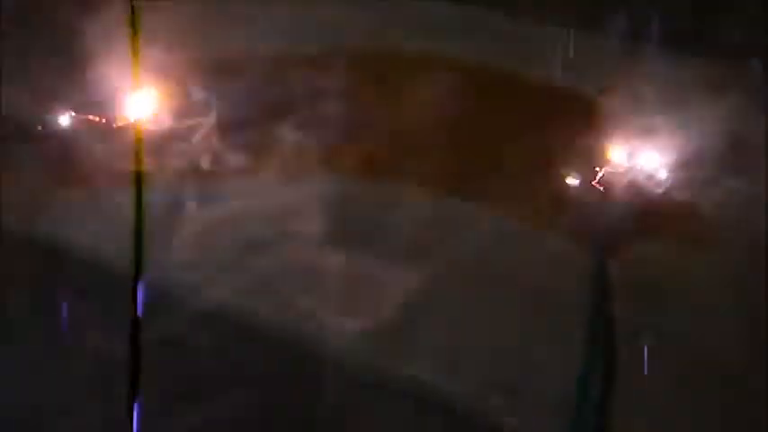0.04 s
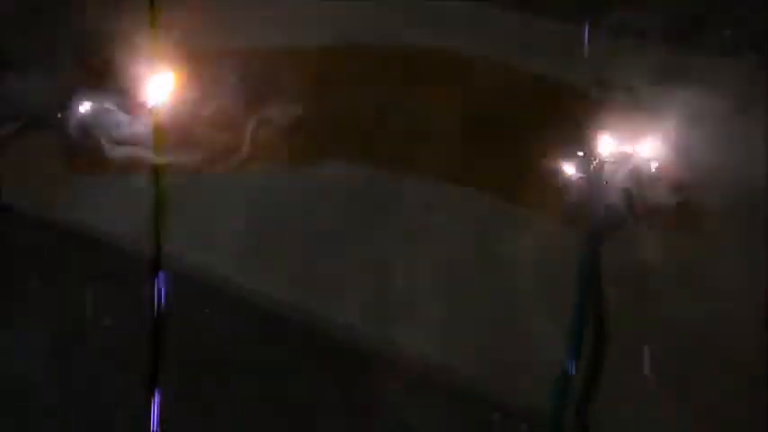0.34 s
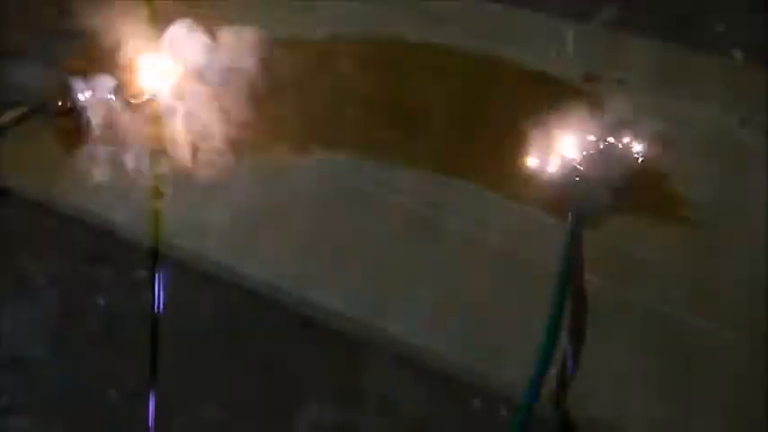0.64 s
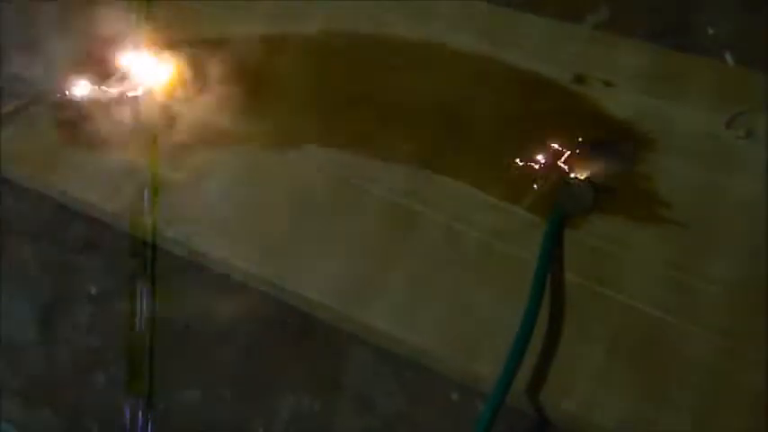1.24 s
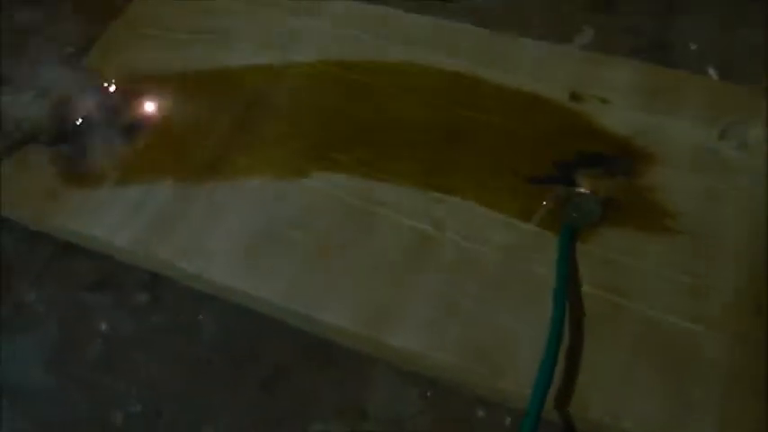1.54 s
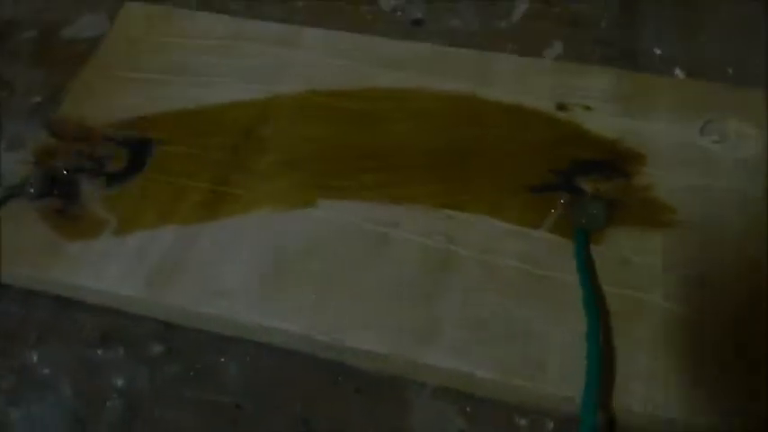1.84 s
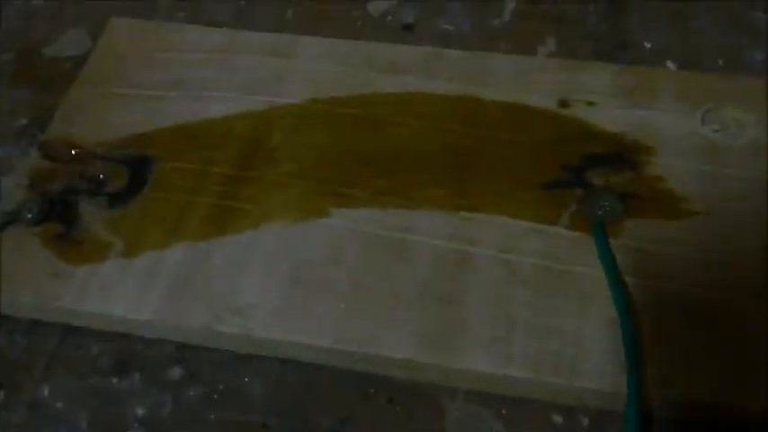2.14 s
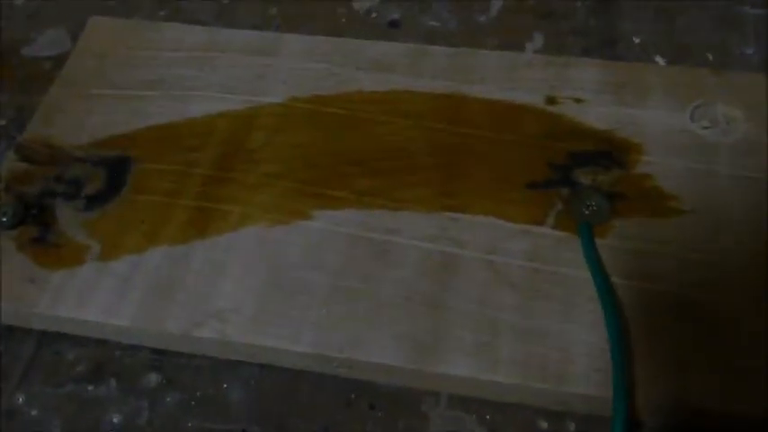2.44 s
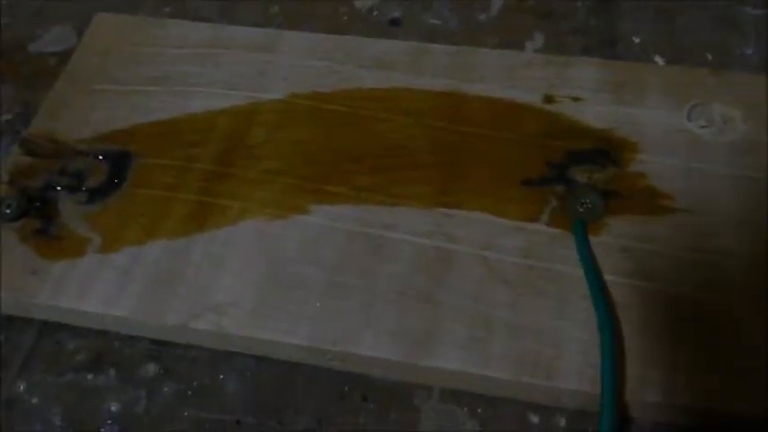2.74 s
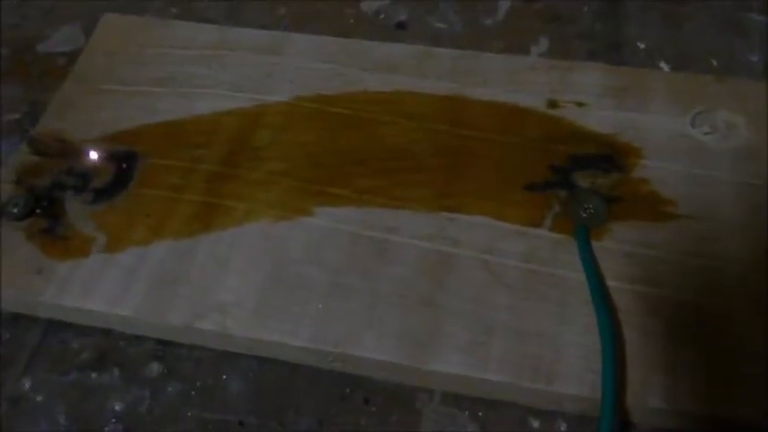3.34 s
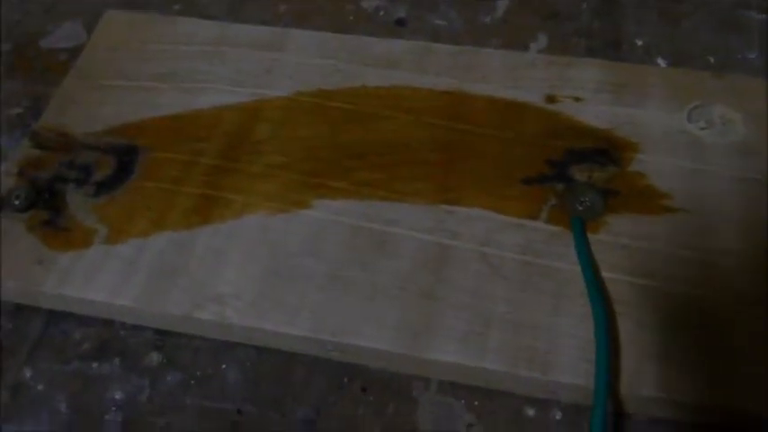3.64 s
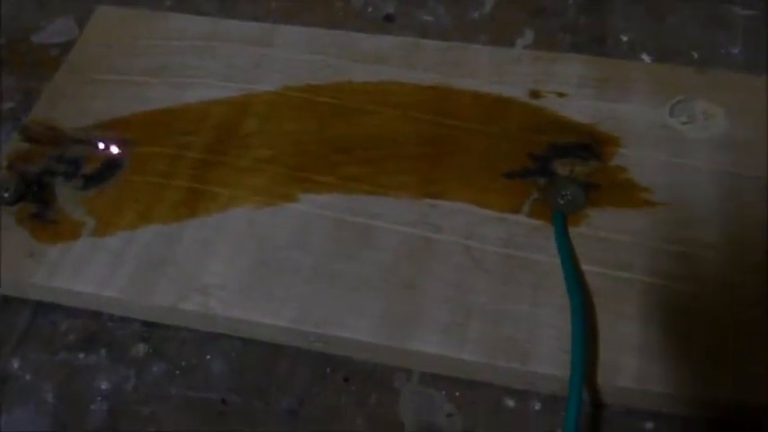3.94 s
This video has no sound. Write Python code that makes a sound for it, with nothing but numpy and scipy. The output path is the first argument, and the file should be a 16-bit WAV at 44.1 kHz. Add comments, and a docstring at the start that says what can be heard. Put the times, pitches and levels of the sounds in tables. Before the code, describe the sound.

An electric arc crackles, buzzes and snaps on a wet wooden board, briefly drops out, relights and cuts off. The burnt wood sizzles, ticks and whistles faintly over a steady transformer hum and rushing air in a small workshop.

```python
"""High voltage burns tracks into a wet wooden board in a small workshop.
An arc lights with a snap and strikes twice in every half cycle of the mains: tiny sparks, pops of
hot air and a buzzing flame. Near 0.5 s it drops out, relights with snaps, and near 1.5 s snaps out.
The charred track sizzles away with ticks and bursting bubbles; from about 2 s steam wheezes, then
whistles thinly. Transformer hum and a rush of room air, present throughout, remain at the end."""
import sys
import numpy as np
from scipy import signal
from scipy.fft import rfft, irfft
from scipy.io import wavfile

SR = 44100
rng = np.random.default_rng(int(sys.argv[2]) if len(sys.argv) > 2 else 0)


def dump(signal):
    """Clip the signal to [-1, 1] and save it as 16-bit WAV at the path in sys.argv[1]."""
    limited = np.clip(np.atleast_2d(signal).T, -1, 1)
    pcm = np.round(limited * 32767).astype(np.int16)
    wavfile.write(sys.argv[1], SR, pcm)


N = 176400
T = np.arange(N) / SR
MAINS_HZ = 60.02
STRIKE_HZ = 4 * MAINS_HZ
STRIKE_AT, STRIKE_CAP = .42, 1.6  # place in the strike cycle; limit of random spread in std deviations

def amp(db):
    """Amplitude ratio of a level in decibels."""
    return 10 ** (np.asarray(db) / 20)

def unit(x):
    """Normalisation to an rms of one."""
    return x / np.sqrt(np.mean(x ** 2) + 1e-20)

def read(points, hz):
    """Interpolation on a logarithmic frequency axis."""
    f, value = np.transpose(points)
    return np.interp(np.log(hz + 1), np.log(f + 1), value)

def level(table, column=1):
    """Amplitude envelope from one dB column of a table."""
    rows = np.array(table)
    return amp(np.interp(T, rows[:, 0], rows[:, column]))

def add(mix, s, sound):
    """Superposition of a sound starting at s seconds."""
    part = mix[..., max(round(s * SR), 0):][..., :len(sound)]
    part += sound[:part.shape[-1]]

def colour(x, spectrum, size=4096):
    """Minimum-phase filter of unit energy: the spectrum sets only relative levels."""
    log_gain = np.log(amp(read(spectrum, abs(np.fft.fftfreq(size, 1 / SR)))))
    ring = np.fft.ifft(np.exp(np.conj(signal.hilbert(log_gain)))).real[:size // 2]
    return np.apply_along_axis(signal.oaconvolve, -1, x, ring / np.linalg.norm(ring))[..., :N]

def drift(hz):
    """Random modulation of unit rms, mostly below hz."""
    knots = rng.standard_normal(4000)
    return unit(np.interp(2 * hz * T, np.arange(len(knots)), knots))

def spray(per_s, spread_db, strike_spread_db, floor):
    """Modulated shot noise: sparks of uneven size swell at each strike and reach each side unequally."""
    cycle = T * STRIKE_HZ
    strike = cycle.astype(int)
    burst = np.exp(-.5 * ((cycle % 1 - STRIKE_AT) / .17) ** 2)
    strike_db = strike_spread_db * np.clip(rng.standard_normal(N)[strike], -2, STRIKE_CAP)
    strength = amp(strike_db - 5.5 * (strike % 2))  # every second strike is weaker
    sizes = amp(spread_db * np.minimum(rng.exponential(1, N), 3)) * rng.choice([-1, 1], N)
    fires = rng.random(N) < per_s / SR
    sparks = sizes * fires * (floor + burst * strength)
    return unit(sparks * (1 + rng.standard_normal((2, N))))

# Envelope of the arc, relative: t/s, spark and pop level/dB, flame level/dB
ARC_ENVELOPE = [(0, -75, -75), (.019, -62, -58), (.024, -24, -25.5), (.15, -25.5, -25), (.21, -26, -26),
                (.3, -26.5, -26), (.4, -25, -30), (.462, -25, -28.5), (.485, -43, -37), (.53, -51, -46),
                (.618, -51, -82), (.628, -32, -59), (.652, -28, -39), (.662, -24.5, -30), (.69, -32, -28.5),
                (.735, -24, -27), (.76, -34, -33.5), (.79, -25.5, -27), (.83, -34.5, -40),
                (.89, -28.5, -30), (.942, -32, -32.5), (.955, -22.5, -30), (.995, -26.5, -29),
                (1.04, -27.5, -28), (1.13, -23, -31.5), (1.18, -37, -29.5), (1.195, -24, -38),
                (1.24, -30, -32.5), (1.32, -25, -31), (1.39, -26.5, -34), (1.455, -34.5, -52),
                (1.49, -33.5, -61), (1.54, -54, -80), (1.62, -65, -85)]
# Spectrum of the sparks: f/Hz, level/dB
SPARK_SPECTRUM = [(40, -50), (120, -42), (200, -23), (400, -6.5), (600, -9.5), (800, -4), (1300, -1.5),
                  (2400, -6), (3500, -6), (5000, -7), (7500, -7), (10000, -10.5), (13000, -8.5),
                  (16000, -14.5)]
def crackle():
    """Filtered shot noise: the arc's many tiny discharges merge into a crackle."""
    sparks = spray(per_s=16000, spread_db=2, strike_spread_db=6, floor=.26)
    return level(ARC_ENVELOPE) * colour(sparks, SPARK_SPECTRUM)

# Harmonics of the flame: multiple of the strike rate, relative level/dB
FLAME_HARMONICS = [(1, 5.5), (2, 9.5), (3, -9.5), (4, 3), (5, -8), (6, -50), (7, -7), (9, -13), (10, -8)]
def flame_buzz():
    """Periodic expansion: the flame swells at every strike and radiates a harmonic series."""
    flame = level(ARC_ENVELOPE, column=2)
    phase = 2 * np.pi * (STRIKE_HZ * T - STRIKE_AT)
    partials = [amp(db) * (1 + .1 * drift(14)) * np.sin(k * phase) for k, db in FLAME_HARMONICS]
    body = (flame / amp(-29.5)) ** .12  # a larger flame has a heavier fundamental
    tone = body * partials[0] + sum(partials[1:])
    return flame * tone / np.std(sum(partials)) * amp([[.4], [-.4]])

# Spectrum of the pops: f/Hz, level/dB
POP_SPECTRUM = [(40, -33), (110, -31), (190, 0), (290, -0.5), (395, 6), (480, -1.5), (630, -12.5),
                (810, 3.5), (1200, -6), (1900, -8), (4000, -11.5), (8000, -18), (16000, -38.5)]
def pops(jitter_s=.0003, spread_db=3.5):
    """Thermal expansion: each strike gives one push of hot air, uneven in size and timing."""
    strikes = np.arange(int(T[-1] * STRIKE_HZ))
    late, size = np.clip(rng.standard_normal((len(strikes), 2)), -STRIKE_CAP, STRIKE_CAP).T
    onsets = ((strikes + STRIKE_AT) / STRIKE_HZ + jitter_s * late) * SR
    sizes = amp(spread_db * size)
    train = np.zeros(N)
    # Removing most of the mean weakens the pitched part of the pulse train.
    train[np.clip(onsets.astype(int), 0, N - 1)] = sizes - .88 * sizes.mean()
    return level(ARC_ENVELOPE) * unit(colour(train, POP_SPECTRUM))

# Hard snaps: t/s, relative level/dB
SNAP_EVENTS = [(0.0212, -9), (.19, -9), (.269, -1), (.4598, -3), (.606, -6), (0.6232, -2), (.6303, -3),
               (0.638, 1), (0.6571, -9.5), (0.6607, -4.5), (0.679, -3), (.847, -6.5), (0.951, -4.5),
               (0.9892, -1.5), (.997, -1), (1.056, -1), (1.0752, -4.5), (1.095, -7), (1.4648, -0.5),
               (1.473, 0.5), (1.481, 0.5)]
# Spectrum of the snaps: f/Hz, level/dB
SNAP_SPECTRUM = [(40, -48), (120, -22), (250, -6.5), (450, -1), (630, -4), (900, 5.5), (1600, -0.5),
                 (3000, -6.5), (6000, -13), (16000, -21.5)]
def snaps(fizz_s=.00035):
    """Impulse excitation: a hard pop and a spit of sparks as the arc lights, jumps or breaks."""
    out, t = np.zeros(N), T[:SR // 100]
    for s, db in SNAP_EVENTS:
        fizz = .2 * (t > 0) * rng.standard_normal(len(t)) * np.exp(-t / fizz_s)
        add(out, s, amp(db) * ((t == 0) + fizz))
    return colour(out, SNAP_SPECTRUM)

# Envelope of the sizzle: t/s, relative level/dB
SIZZLE_ENVELOPE = [(0, -41.5), (.45, -46), (.54, -46), (.6, -59), (.7, -60), (1.45, -37), (1.54, -36),
                   (1.62, -40), (1.68, -44.5), (1.77, -44), (1.82, -44.5), (1.89, -41), (1.95, -57),
                   (2.1, -49.5), (2.3, -83), (4, -76)]
# Late ticks of the embers: t/s, relative level/dB
EMBER_TICKS = [(1.541, -18), (1.697, -13.5), (1.771, -13.5), (1.863, -18), (2.005, -14.5), (2.009, -36),
               (2.039, -16), (2.08, -16.5), (2.097, -18), (2.113, -18), (2.18, -20), (2.23, -18.5),
               (3.666, -19), (3.933, -15.5)]
# Spectrum of sizzle and ticks: f/Hz, level/dB
EMBER_SPECTRUM = [(100, -86), (500, -16), (1200, 10.5), (2500, 6), (5000, 3.5), (9000, 1.5), (12500, -2),
                  (16000, -2)]
def embers(decay_s=.0045):
    """Shot noise and damped noise bursts: the charred track sizzles and ticks."""
    out = level(SIZZLE_ENVELOPE) * spray(per_s=6800, spread_db=4.5, strike_spread_db=.5, floor=.22)
    t = T[:SR // 50]
    for s, db in EMBER_TICKS:
        tick = rng.standard_normal(len(t)) * np.exp(-t / decay_s)
        add(out, s, amp(db) * tick / np.linalg.norm(tick))
    return colour(out, EMBER_SPECTRUM)

# Course of the steam whistle: t/s, f/Hz, relative level/dB
WHISTLE_COURSE = [(2.25, 2380, -72), (2.38, 2410, -58.5), (2.48, 2357, -56), (2.68, 2338, -50.5),
                  (2.8, 2316, -56), (2.94, 2270, -49), (3.021, 2184, -57), (3.08, 2225, -45),
                  (3.18, 2180, -83)]
# Harmonics of the whistle: harmonic number, relative level/dB
WHISTLE_HARMONICS = [(1, -3), (2, -4.5), (3, -12), (5, -23), (6, -21)]
def steam_whistle(jitter=.009, flutter_db=4.5):
    """Flow-driven oscillation: escaping steam sounds a fluttering tone that sinks as the wood cools."""
    s, hz, _ = np.transpose(WHISTLE_COURSE)
    pitch = np.interp(T, s, hz) * (1 + jitter * drift(110))
    phase = 2 * np.pi * np.cumsum(pitch) / SR
    tone = sum(amp(db + flutter_db * drift(30)) * np.sin(k * phase) for k, db in WHISTLE_HARMONICS)
    return level(WHISTLE_COURSE, column=2) * tone * (T > s[0]) * (T < s[-1])

def steam_wheeze(peak_s=2.125, width_s=.15, hz=2150):
    """Random frequency modulation: a short, rough tone as the steam first finds its way out."""
    phase = 2 * np.pi * np.cumsum(hz * (1 + .02 * drift(150))) / SR
    swell = np.exp(-((T - peak_s) / width_s) ** 2)
    return amp(-51) * swell * np.sin(phase)

# Bubbles in the wet track: t/s, f/Hz, relative level/dB
BUBBLE_BURSTS = [(1.775, 1200, -31), (1.855, 1180, -32), (1.876, 860, -27.5), (2.101, 960, -28),
                 (2.477, 1210, -41), (3.537, 970, -44), (3.703, 900, -29)]
def bubbles(decay_s=.0036):
    """Damped resonance: each bursting bubble rings with a short, soft blip."""
    out, t = np.zeros(N), T[:SR // 25]
    for s, hz, db in BUBBLE_BURSTS:
        add(out, s, amp(db) * np.exp(-t / decay_s) * np.sin(2 * np.pi * hz * t))
    return out

# Harmonics of the transformer: multiple of the mains frequency, level/dB
HUM_HARMONICS = [(4, -60), (6, -73.5), (8, -42), (12, -43.5), (16, -58.5), (20, -54), (24, -61.5),
                 (28, -80.5), (32, -60.5), (40, -67), (60, -67.5)]
def transformer_hum():
    """Forced vibration: the transformer sings on even multiples of the mains, each wavering slightly."""
    phase = 2 * np.pi * MAINS_HZ * T
    tone = sum(amp(db) * (1 + .1 * drift(2.7)) * np.sin(k * phase) for k, db in HUM_HARMONICS)
    return np.sqrt(2) * tone * amp([[.5], [-.5]])

# Spectrum of the room air: f/Hz, relative level/dB
AIR_SPECTRUM = [(25, -40), (60, -15), (78, -27.5), (92, 1.5), (120, -13), (145, -4), (250, -2), (400, 3),
                (600, -2.5), (850, 8.5), (1400, 0.5), (2200, -1), (3000, -3.5), (4500, -7.5), (7000, -14),
                (10000, -19), (16000, -22)]
# Likeness of left and right: f/Hz, coherence
AIR_COHERENCE = [(60, 0.9), (150, 0.72), (380, 0.61), (950, 0.45), (2400, 0.65), (6000, 0.38),
                 (15000, 0.14)]
# Balance of the air: f/Hz, left minus right level/dB
AIR_TILT = [(60, 6), (150, -2.5), (380, 0.5), (950, -1), (2400, -3), (6000, -1.5), (15000, 1)]
# Phase lead of the left side: f/Hz, phase/rad
AIR_LEAD = [(0, -0.5), (600, 0.3), (860, -2.5), (1890, -3), (2150, -2.5), (3880, -3), (5340, -3.1),
            (15800, -5)]
def room_air():
    """Partially coherent noise: a steady rush of air, perhaps from a fan, partly alike on both sides."""
    hz = np.fft.rfftfreq(N, 1 / SR)
    common, separate = rfft(rng.standard_normal((2, N)))
    coherence, tilt_db = read(AIR_COHERENCE, hz), read(AIR_TILT, hz) / 2
    left = common * amp(tilt_db) * np.exp(1j * read(AIR_LEAD, hz))
    right = (coherence * common + np.sqrt(1 - coherence ** 2) * separate) * amp(-tilt_db)
    return amp(-41) * unit(irfft(np.array([left, right]) * amp(read(AIR_SPECTRUM, hz)), N))

# Reverberation time of the workshop: f/Hz, T60/s
REVERB_TIME = [(100, 0.16), (400, 0.45), (1500, 0.2), (5000, 0.16), (16000, 0.18)]
# Balance of sound from the board: f/Hz, left minus right level/dB
BOARD_TILT = [(200, 0.5), (500, 0), (1200, 0), (2500, -8.5), (5000, -6.5), (9000, -1.5), (14000, -0.5)]
# Phase lead of the left side: f/Hz, phase/rad
BOARD_LEAD = [(100, -0.18), (500, -0.18), (1200, -1), (2500, -0.6), (3200, -1.2), (4300, 0.59),
              (7000, 1.13), (16000, 0.66)]
def workshop(x, bench_db, bench_s, room_db, size=16384):
    """Convolution: direct sound from the right, quick echoes off board and bench, a short room tail."""
    t, hz = T[:size], np.fft.rfftfreq(size, 1 / SR)
    bench = rng.standard_normal((2, size)) * np.exp(-t / bench_s) * (t > .0005)
    f, when, noise = signal.stft(rng.standard_normal((2, size)), SR, nperseg=256)
    decay = amp(-60 * when / read(REVERB_TIME, f)[:, None])
    tail = signal.istft(noise * decay, SR, nperseg=256)[1][:, :size] * (t > .005)
    bench, tail = (rfft(v / np.linalg.norm(v, axis=1, keepdims=True)) for v in (bench, tail))
    mono = 1 / (1 + (hz / 2060) ** 4)  # both sides share the low part of the tail
    room = np.sqrt(1 - mono) * tail + np.sqrt(mono / 2) * tail.sum(0)
    echoes = amp(bench_db) * bench * (1 - mono) + amp(room_db) * room
    sides = np.array([[.5], [-.5]])
    direction = amp(read(BOARD_TILT, hz) * sides) * np.exp(1j * read(BOARD_LEAD, hz) * sides)
    lead = size // 128  # samples of room for ringing ahead of the direct sound
    response = np.roll(irfft((1 + echoes) * direction, size), lead, 1)
    return signal.fftconvolve(np.atleast_2d(x), response, axes=1)[:, lead:lead + N]

def scene():
    """Superposition: the arc and the cooling track in the workshop, over hum and air."""
    sparks = workshop(crackle(), bench_db=-9, bench_s=.012, room_db=-5)
    blows = workshop(amp(-8) * pops() + amp(-2.5) * snaps(), bench_db=4, bench_s=.0013, room_db=-6.5)
    hot_wood = embers() + steam_whistle() + steam_wheeze() + bubbles()
    track = workshop(hot_wood, bench_db=-6, bench_s=.0058, room_db=-3)
    return amp(-2.5) * sparks + blows + amp(-3) * track + flame_buzz() + transformer_hum() + room_air()

def record(dry):
    """Soft saturation rounds the highest peaks; filters then limit the band to 30-15950 Hz."""
    ceiling = amp(-7)
    rounded = ceiling * np.tanh(dry / ceiling)
    highpass = signal.butter(2, 30, "high", fs=SR, output="sos")
    lowpass = signal.firwin(511, 15950, window=("kaiser", 9), fs=SR)
    return signal.oaconvolve(signal.sosfilt(highpass, rounded), lowpass[None], "same")

dry = scene()
out = record(dry)
dump(out)
```